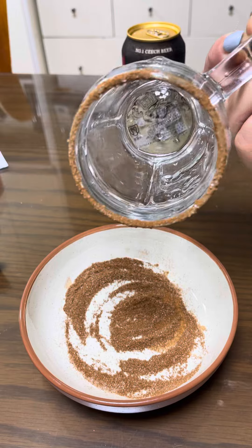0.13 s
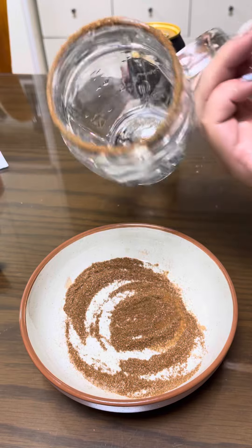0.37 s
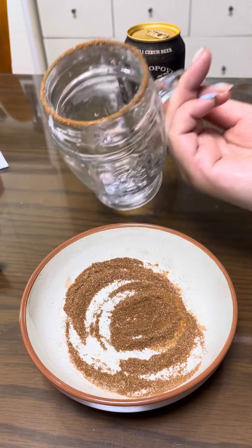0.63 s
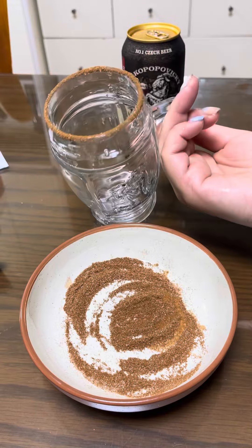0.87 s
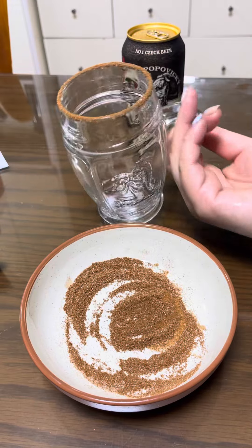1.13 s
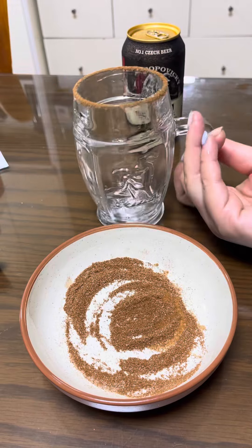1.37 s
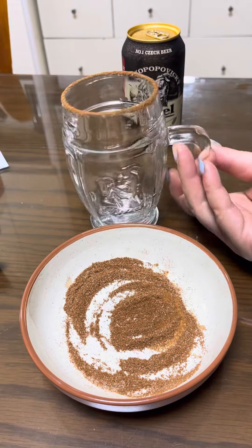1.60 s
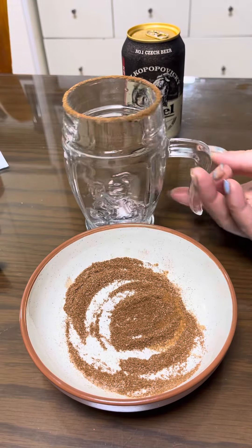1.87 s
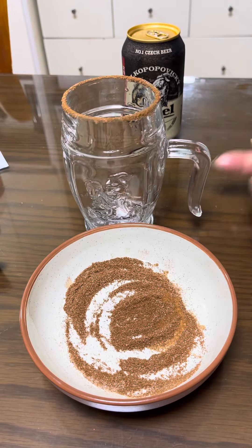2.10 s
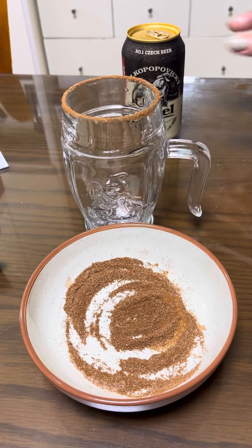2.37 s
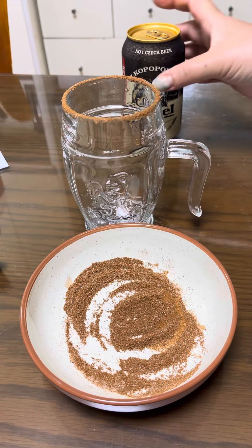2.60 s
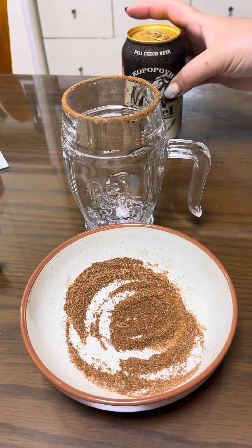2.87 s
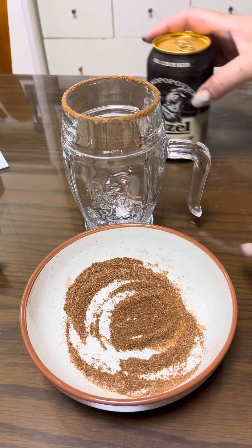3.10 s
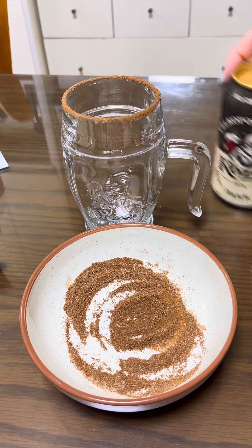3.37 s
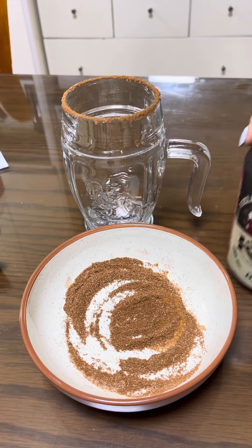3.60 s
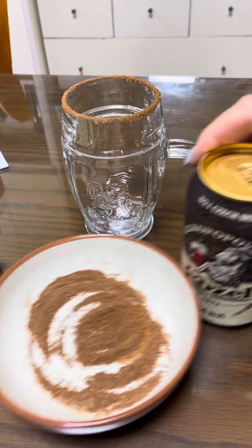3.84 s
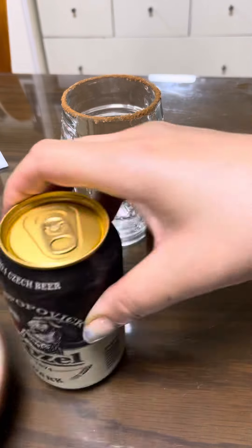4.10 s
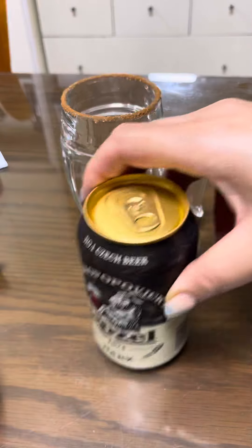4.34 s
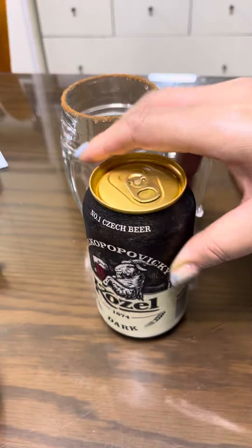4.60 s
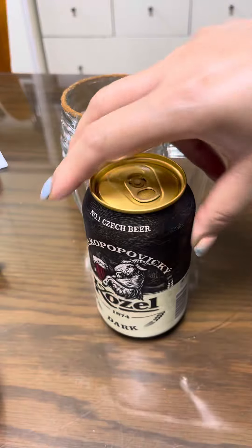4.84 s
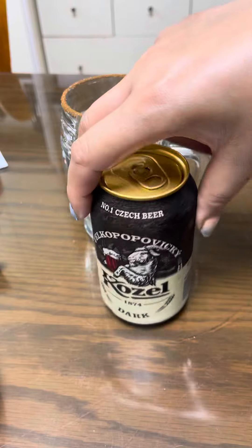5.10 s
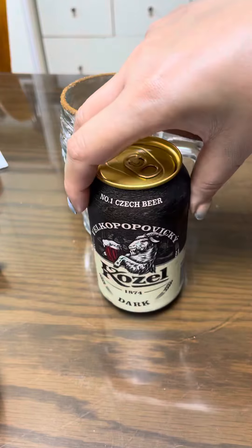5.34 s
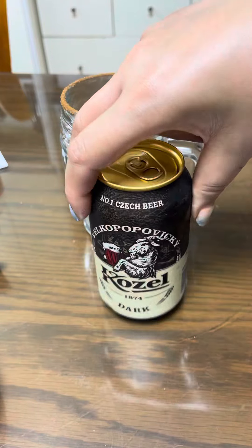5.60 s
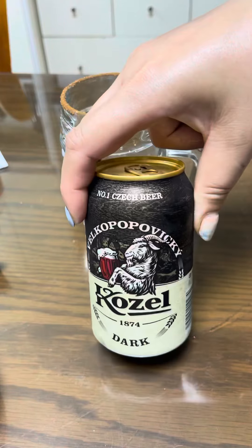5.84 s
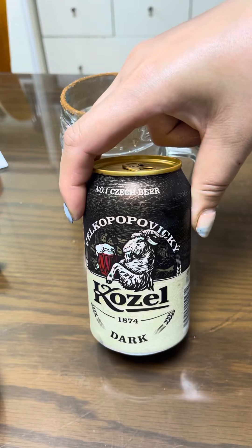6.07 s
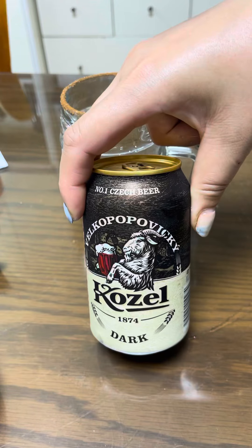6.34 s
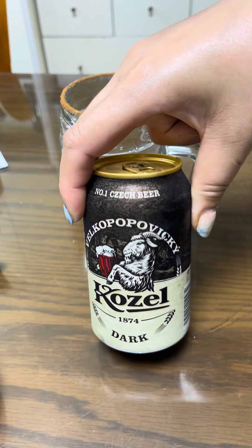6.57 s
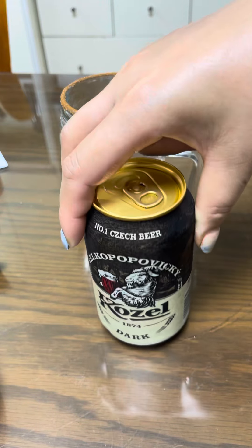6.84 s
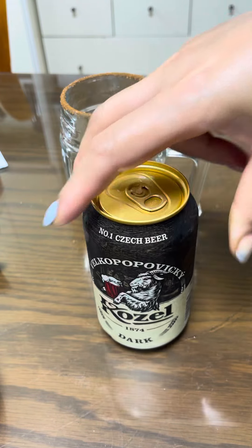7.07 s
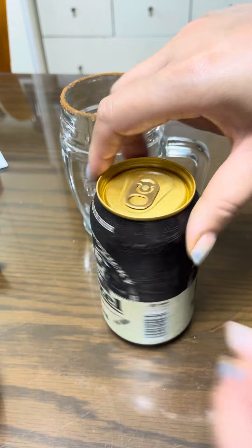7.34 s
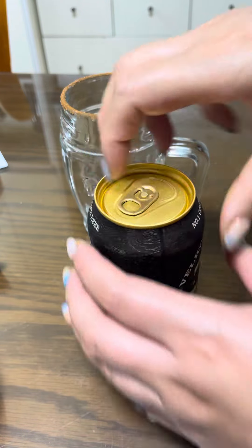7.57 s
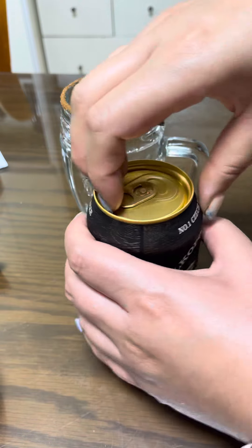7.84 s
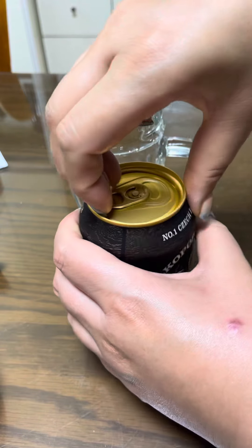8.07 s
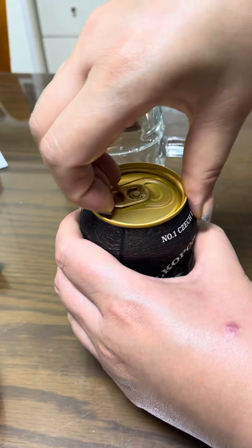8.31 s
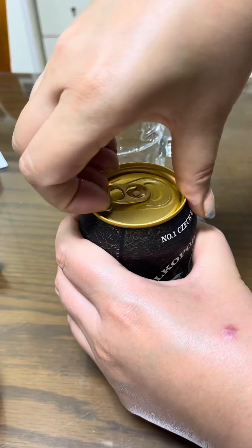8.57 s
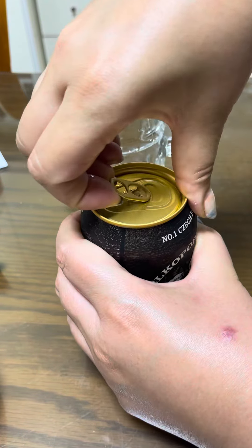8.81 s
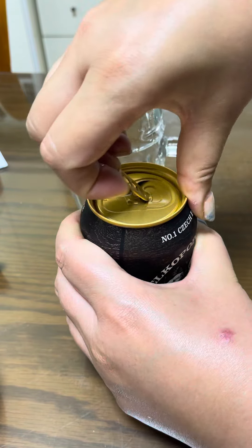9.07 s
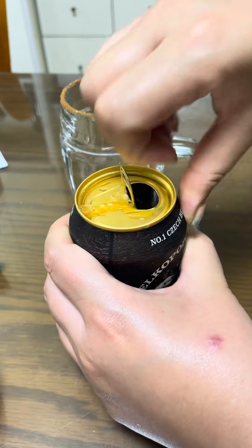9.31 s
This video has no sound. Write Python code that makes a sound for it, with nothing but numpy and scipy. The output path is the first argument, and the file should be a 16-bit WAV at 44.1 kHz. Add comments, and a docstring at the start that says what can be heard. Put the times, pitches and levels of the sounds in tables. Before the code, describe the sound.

Very close in a small hard room with a faint appliance hum, a thick glass mug lands hard on a wooden table and is turned with duller knocks. A can squeaks under the grip, a ceramic plate is shoved aside with knocks and gritty scraping, and the full can is set down and tilted softly. Fingernails tick on the lid, then gas spits and the metal tears open in sharp cracks.

```python
"""Mug, plate and can on a kitchen table

Close to a phone, a heavy glass mug is set down and turned, a plate is pushed aside, a full can is put down
and tilted, then a fingernail lifts its tab: gas hisses out and the lid tears open. Blows are noise bursts
with ringing modes; scraping, skin and gas are shaped noise. An appliance hums in a small hard room;
both microphone ports hear nearly the same sound with a phase twist."""
import sys
import numpy as np
from scipy import signal
from scipy.fft import rfft, irfft, next_fast_len
from scipy.io import wavfile
from scipy.ndimage import uniform_filter1d, map_coordinates

SR = 44100
rng = np.random.default_rng(int(sys.argv[2]) if len(sys.argv) > 2 else 0)


def ratio_of_db(decibels):
    """Turn decibels (scalar or array-like) into linear amplitude factors; 0 dB maps to 1."""
    return 10 ** (np.asarray(decibels, float) / 20)


def unload_audio(sound):
    """Save the sound as a 16-bit wav file, at the path given as the first command line argument."""
    columns = np.transpose(np.atleast_2d(sound))
    # keep every value between -1 and 1, then stretch to whole-number steps
    steps = np.round(np.clip(columns, -1, 1) * 32767)
    wavfile.write(sys.argv[1], SR, steps.astype(np.int16))


N = 416294
LEAD = 200  # samples of room before a burst for its filtered edge

# treble snap of a hard contact: f/Hz, level/dB per Hz
SNAP_SPECTRUM = [(3500, -19), (5200, 7.5), (6500, -2), (8500, 9), (10800, 2), (12300, -14.5), (13500, -31),
                 (17000, -64)]


def unit(x):
    """Brings a sound to rms 1."""
    return x / np.sqrt(np.mean(x ** 2) + 1e-20)


def along(points, hz):
    """Reads a curve of (Hz, value) points on a log frequency axis."""
    f, v = np.transpose(points)
    return np.interp(np.log(hz + 1), np.log(f + 1), v)


def gains(rows):
    """Gives a gain per sample for (s, dB) corners, silent outside them."""
    s, db = np.transpose(rows)
    return ratio_of_db(np.interp(np.arange(N) / SR, s, db, left=-200, right=-200))


def wobble(rate):
    """Draws a smooth random curve with rate knots a second."""
    knots = rng.standard_normal(int(N * rate / SR) + 4)
    return map_coordinates(knots, [np.arange(N) * rate / SR])


def filtered(x, response):
    """Multiplies the spectrum of x by a complex response of frequency."""
    m = next_fast_len(x.shape[-1] + 8192)
    spectrum = rfft(x, m) * response(np.fft.rfftfreq(m, 1 / SR))
    return irfft(spectrum, m)[..., :x.shape[-1]]


def coloured(x, spectrum):
    """Filters x with a spectrum and brings it to rms 1."""
    return unit(filtered(x, lambda hz: ratio_of_db(along(spectrum, hz))))


def diffuse(pair):
    """Mixes two unrelated signals into a left and right that are partly alike."""
    # left-right likeness of diffuse sound: f/Hz, likeness (1 = the same)
    likeness = [(200, 1), (400, 0.89), (700, 0.468), (1200, 0.14), (1800, 1), (2700, 0.63), (4300, 0.085),
                (5000, 0.43), (6000, 0.79), (7500, 0.43), (8500, 0.96), (9500, 1), (10800, 0.21)]
    turn = lambda hz: np.arccos(np.clip(along(likeness, hz), 0, 1)) / 2
    mid, side = filtered(pair, lambda hz: np.array([np.cos(turn(hz)), np.sin(turn(hz))]))
    return np.array([mid + side, mid - side])


def add(track, s, sound):
    """Mixes a sound in at time s."""
    part = track[round(s * SR):][:len(sound)]
    part += sound[:len(part)]


def ring(modes, db, ms, blur=.003):
    """Modes swing up while the contact lasts and die away; hand and table blur their pitch; peak at db."""
    t = np.arange(SR // 3) / SR
    hz, level, t60 = np.transpose(modes)[:, :, None]
    spread, phase = 1.5 * rng.normal(0, 1, (2, *hz.shape))
    steps = uniform_filter1d(rng.standard_normal((len(hz), len(t))), size=64, axis=1)
    drift = np.cumsum(steps, axis=1)
    turns = hz * (t + blur * drift * 8 / SR)
    sign_turn = np.pi * np.arange(len(hz))[:, None]  # every other mode starts upside down
    waves = np.sin(2 * np.pi * turns + .5 * phase + sign_turn)
    body = np.sum(ratio_of_db(level + spread - 60 * t / t60) * waves, axis=0)
    swing_up = (1 - np.exp(-t / (ms / 4000 + 0.000097))) ** 2
    out = body * swing_up
    return ratio_of_db(db) * out / np.max(np.abs(out))


def crack(spectrum, db, ms):
    """A dry burst of noise follows the contact time, its chance spectral peaks evened out; peak at db."""
    u = np.clip(np.arange(-LEAD, SR // 20) / SR / (ms / 1000 + 1e-4), 0, None)  # time in contacts
    z = rfft(rng.standard_normal(len(u)) * u * np.exp(-2.5 * u))
    evened = irfft(z / (np.abs(z) + 1e-9) ** .7, len(u))
    out = coloured(evened, spectrum) * signal.windows.tukey(len(u), .1)
    return ratio_of_db(db) * out / np.max(np.abs(out))


def set_down(events, modes, order, ring_db, tick_db, edge_hz, grows):
    """The rim clacks, duller when gentle, the object rings and the table swings up a moment later.

    Gives four rows: clack, ringing of the object, two views of the wide table."""
    # table frame: f/Hz, t60/s, level/dB under the mug, under the plate, under the can
    frame_modes = [(74.6, 0.141, -8, 1.5, -11), (105.7, 0.061, -5.5, -3, 1.5), (142, 0.081, -1.5, -7, 0.5),
                   (196, 0.07, 0.5, -1, 2.5), (261, 0.067, 2.5, 4.5, 6), (336, 0.066, 2, -4, -11),
                   (399.4, 0.046, 6.5, 4.5, 1), (456.5, 0.035, -1, 5.5, -5)]
    # table top: f/Hz, level/dB, t60/s
    top_modes = [(521, -5, 0.076), (638.5, 2, 0.045), (774, 0, 0.041), (908, 2, 0.027), (1083, -5.5, 0.057)]
    # heavy bases on varnish: f/Hz, level/dB per Hz
    clack_spectrum = [(500, -1), (1000, -1), (1600, 2.5), (2300, 4.5), (3100, -5.5), (4500, -6),
                      (6200, -27), (9000, -80)]
    tick_grows = 0.84  # harder blows are brighter: extra dB of treble tick per dB of clack
    tick_db_per_ms = -0.6  # slower contacts are duller
    out = np.zeros((4, N))
    frame = [(hz, levels[order], t60) for hz, t60, *levels in frame_modes]
    for s, db, thud_db, top_db, ms in events:
        # the treble edge falls by grows dB per dB
        soft = lambda hz: 1 / (1 + 1j * hz / (edge_hz * ratio_of_db(grows * db))) ** 3
        clack = filtered(crack(clack_spectrum, db, ms), soft)
        tick = crack(SNAP_SPECTRUM, db * (1 + tick_grows) + tick_db + tick_db_per_ms * ms, ms)
        add(out[0], s - LEAD / SR, clack + tick)
        add(out[1], s, filtered(ring(modes, db + ring_db, ms, blur=.02), soft))
        for view in out[2:]:
            add(view, s + 0.0011, ring(top_modes, db + thud_db + top_db, ms, blur=0.093))
            add(view, s + 0.0019, ring(frame, db + thud_db, ms, blur=0.056))
    return out


def metal_contacts(events, modes, contact_ms, ring_db, follows, blur):
    """Each tap or tear of the metal cracks, snaps in the treble, rings and sounds the can's hollow."""
    # crack of thin metal: f/Hz, level/dB per Hz
    crack_spectrum = [(500, -17), (1100, -11), (1700, 0.5), (2400, 5.5), (3500, -1), (4300, 5), (5400, -1),
                      (6800, -1.5), (8200, -33.5), (10000, -82)]
    # hollow of the can: f/Hz, level/dB, t60/s
    hollow_modes = [(340, 11, 0.0067), (790, -5.5, 0.025), (1373, 10, 0.013)]
    fold_s, fold_ms = 9.075, 3  # from here on the flap folds inward more slowly
    torn_s, torn_db = 8.85, 8  # the lid rings less once it is torn and held
    out = np.zeros(N)
    for s, db, snap_db, hollow_db in events:
        ms = contact_ms if s < fold_s else fold_ms
        burst = crack(crack_spectrum, db, ms) + crack(SNAP_SPECTRUM, db + snap_db, ms)
        add(out, s - LEAD / SR, burst)
        body_db = db + ring_db + follows * hollow_db - torn_db * (s > torn_s)
        add(out, s, ring(modes, body_db, ms, blur))
        add(out, s, ring(hollow_modes, db + hollow_db, ms, blur=0.11))
    return out


def tones(events, ms, blur):
    """Sounds one dying mode for each event."""
    out = np.zeros(N)
    for s, hz, db, t60 in events:
        add(out, s, ring([(hz, 0, t60)], db, ms, blur))
    return out


def appliance():
    """Motor tones waver slowly over a broad rush of air."""
    # motor tones: f/Hz, rms level before wavering/dB, waver/dB
    motor_tones = [(43, -60, 2), (58.5, -60, 2.5), (117, -67, 2), (156.5, -54, 1.5), (241, -64, 2)]
    # rush of air: f/Hz, level/dB per Hz
    air_spectrum = [(22, -19.5), (40, -8), (70, -5.5), (130, -6), (370, -8.5), (450, -16.5), (900, -20),
                    (1500, -24.5), (3500, -22), (4900, -20), (5700, -16.5), (6500, -22.5), (11200, -25),
                    (12000, -52), (12400, -110)]
    air_db = -51
    t = np.arange(N) / SR
    hum = np.zeros(N)
    for hz, db, waver_db in motor_tones:
        level = np.sqrt(2) * ratio_of_db(db + waver_db * wobble(8.9))
        hum += level * np.sin(2 * np.pi * hz * t + 1.03 * wobble(2.11))
    air = coloured(rng.standard_normal((2, N)), air_spectrum)
    return hum + ratio_of_db(air_db) * diffuse(air)


def fingers():
    """Skin scuffs softly: each brush is a swell of noise in one broad band."""
    # fingers brushing glass and metal: t/s, approximate peak level/dB, t60/s
    brushes = [(0.1635, -30, 0.2), (0.741, -36.5, 0.4), (1.0946, -39, 0.092), (1.609, -40, 0.089),
               (2.1763, -35.5, 0.28), (2.471, -31, 0.18), (2.6185, -47.5, 0.27), (5.251, -32.5, 0.35),
               (7.126, -38, 0.11), (7.156, -40.5, 0.18)]
    hz, rise_s = 3320, 0.0088  # middle of the band, swell time
    crest_db = 10.5  # noise peaks this far over its rms
    band = [(hz * 0.24, -30), (hz * 0.7, -3), (hz, 0), (hz * 1.42, -5), (hz * 3.86, -15), (hz * 3.3, -70)]
    out, t = np.zeros(N), np.arange(SR // 3) / SR
    for s, db, t60 in brushes:
        shape = (1 - np.exp(-t / rise_s)) * ratio_of_db(-60 * t / t60)
        noise = coloured(rng.standard_normal(len(t)), band)
        add(out, s - .003, ratio_of_db(db - crest_db) * shape / shape.max() * noise)
    return out


def mug():
    """The thick glass mug clacks on the table, and its short glass modes ring."""
    # blows: t/s, clack peak/dB, frame thud/dB re clack, table top/dB re thud, contact/ms
    blows = [(.8004, -4.5, -4.5, -5.5, 1.56), (.802, -4, -9, -1.5, 0.96), (1.3262, -38, -5, -2, 1.5),
             (1.3346, -24.5, -6.5, 1, 1.4), (1.3421, -18.5, -10.5, -2, 2.1), (1.4091, -28.5, -11, -9, 2.4),
             (1.570, -29.5, -19, -13, 2.1), (1.8206, -13, -15, -11, 5), (1.8246, -12, -0.5, -5, 3.8),
             (1.8723, -15, -3.5, -8, 1.9), (1.8826, -20, -2.5, 1, 2.4)]
    # glass body: f/Hz, level/dB, t60/s
    glass = [(1060, -7, .015), (1580, -1, .01), (1870, -5, .012), (2190, 0, .01), (2660, -5, .01),
             (3050, -2, .01), (3600, -3, .01), (4200, -5, .008)]
    return set_down(blows, glass, order=0, ring_db=0.5, tick_db=-1.0, edge_hz=20000, grows=0.79)


def singing():
    """The mug's wall, the plate's rim and the can's base sing in single thin tones as they land flat."""
    # tones: t/s, f/Hz, peak level/dB, t60/s
    thin_tones = [(1.873, 2977, -34.5, .24), (3.712, 3424, -40, .18), (4.207, 1760, -37, .15),
                  (5.828, 1520, -34, .13)]
    return tones(thin_tones, ms=3.8, blur=.003)


def drag():
    """Can and plate drag over grit: dense uneven grains, coarse and fine, in strokes that speed up and slow."""
    # strokes over the varnish: start t/s, length/s, scrape level/dB, fine hiss/dB re scrape
    strokes = [(2.87, 0.62, -58, 0.5), (3.339, 0.21, -49, 1), (3.533, 0.11, -47.5, 0.5),
               (3.657, 0.16, -47, 0), (3.797, 0.21, -48.5, 1.5), (3.945, .2, -42.5, -2),
               (6.57, 0.18, -57.5, 0), (7.077, 0.28, -60.5, 4.5), (8.15, 0.15, -58, -1)]
    # coarse grains in the wood: f/Hz, level/dB per Hz
    scrape_spectrum = [(300, 10.5), (700, -2), (1500, -10), (2050, -23), (2700, -9), (3600, -9), (5000, 3),
                       (6000, -39), (7500, -100)]
    # fine grains in the air: f/Hz, level/dB per Hz
    fine_spectrum = [(4000, -41), (5500, -5), (7500, -3), (11000, 1), (12300, -25), (13000, -80)]
    # bodies that the grit wakes by turns: f/Hz, resonance width/Hz, level/dB re scrape
    rubbed_bodies = [(1740, 300, -8), (2300, 380, -6), (3050, 370, -13)]
    peak_share, roundness = 0.45, 1.05  # share of the stroke spent speeding up; softness of its ends
    t = np.arange(N) / SR
    speed = []
    for s, length, *_ in strokes:
        ramp = np.interp(t, [s, s + peak_share * length, s + length], [0, 1, 0])
        speed.append(np.sin(np.pi / 2 * ramp) ** roundness)
    _, _, db, fine_db = np.transpose(strokes)
    grains = rng.standard_normal((2, N)) * ratio_of_db(3.9 * wobble(150) + 2.1 * wobble(30))
    coarse = coloured(grains[0], scrape_spectrum)
    for centre, width, body_db in rubbed_bodies:
        resonance = lambda hz: (1j * hz * width / (centre ** 2 - hz ** 2 + 1j * hz * width)) ** 2
        body = filtered(grains[0] * ratio_of_db(3 * wobble(25)), resonance)
        coarse = coarse + ratio_of_db(body_db) * unit(body)
    fine = coloured(grains[1], fine_spectrum)
    return ratio_of_db(db) @ speed * coarse + ratio_of_db(db + fine_db) @ speed * fine


def squeaks():
    """The can's wall squeaks under the grip in short, slowly swelling tones."""
    # squeaks: t/s, f/Hz, peak level/dB, t60/s
    grip_squeaks = [(3.025, 2460, -53, 0.18), (3.03, 3200, -59, .08), (3.055, 2160, -56, .2),
                    (3.125, 2480, -57, 0.16), (3.145, 2240, -59, 0.1), (3.232, 2180, -53, 0.046),
                    (3.382, 2420, -36.5, 0.045), (3.425, 2420, -58, .15), (3.46, 3040, -54, .1),
                    (3.465, 2350, -58, .08), (3.557, 2220, -48, 0.047), (3.583, 3050, -57, 0.042),
                    (6.61, 2940, -57, .06), (6.635, 2350, -55, .12), (6.67, 1524, -57, 0.14),
                    (6.672, 2880, -51, 0.039), (7.145, 2950, -54, .1)]
    return tones(grip_squeaks, ms=30, blur=.012)


def fingernail():
    """The nail taps the sealed, pressurised can, whose stiff shell rings briefly."""
    # taps: t/s, crack peak/dB, snap/dB re crack, hollow/dB re crack
    taps = [(3.2326, -46, 13, -3), (3.3823, -40.5, 17, 5), (3.4695, -47.5, 14, 10.5),
            (3.5514, -47, 15, -14), (3.5863, -37, 15.5, -26), (3.695, -37, 15, -1), (4.018, -38, -1, -10),
            (4.0514, -42, -3, -6), (4.2544, -45, 10.5, -10), (7.7116, -33.5, 4, -10),
            (7.7243, -29.5, 7.5, -12), (7.7744, -51, 16, -1), (8.0514, -26.5, 15.5, -2.5),
            (8.0844, -43, 14, 0), (8.2043, -48.5, 17, 0), (8.2866, -42, 11, -20)]
    # shell of the sealed can: f/Hz, level/dB, t60/s
    shell = [(2450, 0, .022), (3050, -4, .022), (6100, -8, .025)]
    return metal_contacts(taps, shell, contact_ms=3.1, ring_db=3, follows=0.25, blur=0.0075)


def plate():
    """The plate knocks on the table as it is pushed, and its ceramic modes ring."""
    # blows: t/s, clack peak/dB, frame thud/dB re clack, table top/dB re thud, contact/ms
    blows = [(3.711, -11, -15, -2, 2.2), (3.7369, -19, -8.5, -2.5, 1.6), (3.7614, -18.5, -16, 5, 1.5),
             (3.9294, -42.5, -0.5, 7, 1.7), (3.9459, -30, -30, -1, 0.83), (3.9944, -34, -21, 20, 1.4),
             (4.0018, -20, -8, 4, 2.26)]
    # ceramic body: f/Hz, level/dB, t60/s
    ceramic = [(1050, -3, .025), (1717, -3, .025), (2290, -4, .018), (2570, -3, .018), (6760, -20, .03)]
    return set_down(blows, ceramic, order=1, ring_db=-5.5, tick_db=-2.0, edge_hz=27000, grows=0.41)


def can():
    """The full can lands and tilts on its base, whose metal modes ring."""
    # blows: t/s, clack peak/dB, frame thud/dB re clack, table top/dB re thud, contact/ms
    blows = [(4.2053, -22, 4.5, -2, 3.5), (5.2201, -43, 5.5, -4, 2.4), (5.8272, -27, 7, -11, 5.5),
             (6.6717, -42, 9, -19, 4.5), (6.8597, -66, 32.5, -18, 5.5), (6.8788, -27.5, 1.5, -4.5, 3.2),
             (7.1626, -42, 7, -17, 4.8), (7.214, -44.5, -13, -10, 1.8), (8.1824, -48.5, 8, -1.5, 1.9)]
    # base of the can: f/Hz, level/dB, t60/s
    base = [(1150, -10, .025), (1520, -1, .03), (1770, -4, .025), (2320, -5, .025), (2700, -4, .022),
            (2950, -5, .022), (3400, -4, .012)]
    return set_down(blows, base, order=2, ring_db=1.5, tick_db=11.5, edge_hz=34000, grows=0.5)


def tearing_lid():
    """The lid tears in a run of sharp cracks that make the bent metal and the tab ring."""
    # tears: t/s, crack peak/dB, snap/dB re crack, hollow/dB re crack
    tears = [(8.6205, -33.5, -8, -24), (8.6312, -14.5, 14.5, -33), (8.6338, -28, 24, -39),
             (8.7042, 0, -7, -26.5), (8.939, -29, -15, -5), (8.9505, -4.5, 2, -9), (8.9555, -24, -7, -21),
             (8.9595, -12, -8, -21), (8.966, -16.5, -5, -23), (9.018, -38, 19, -28), (9.0361, -15, 4, -35),
             (9.042, -21.5, 6, -30), (9.0536, -21, 13, -24), (9.0567, -21.5, 18, -8), (9.061, -26, 16, -10),
             (9.067, -22, -2, -9), (9.081, -15, 6, -32), (9.0855, -5.5, 8, -4.5), (9.096, -35.5, -13, 11),
             (9.1125, -16.5, -20, 1), (9.120, -25, -5.5, 9)]
    # bent lid and tab: f/Hz, level/dB, t60/s
    lid = [(2100, -26, .07), (2330, -3, .012), (3784, -25, .28), (3900, -20, .08), (3980, 2, .015),
           (4145, -26, .2), (4300, -30, .2), (5250, -1, .012), (6650, -5, .012)]
    return metal_contacts(tears, lid, contact_ms=1.3, ring_db=-2, follows=0, blur=.025)


def gas():
    """A turbulent jet sputters as foam crosses the slit; the breaking seal puffs low."""
    # jet and low jet: f/Hz, level/dB per Hz
    jet_spectrum = [(7500, -63), (9000, 8), (11000, 1), (12600, -7.5), (14600, -12), (15600, -46)]
    low_spectrum = [(800, -33.5), (2500, -25), (4500, -13), (6500, -8), (8000, -2.5), (9500, -29.5),
                    (11000, -80)]
    seal_s, build_s, wide_s = 8.634, 0.045, 8.706  # seal breaks, jet builds up, slit tears wide
    collapse_s, fizz_fade_s = 0.0136, 0.27
    start_db, full_db, wide_db, fizz_db = -31, -13.5, -23.5, -48.5
    low_db, puff_db, puff_fade_s = -14, -19, 0.007  # low_db is relative to the jet
    fizz_s = wide_s + collapse_s
    jet = gains([(seal_s, start_db), (seal_s + build_s, full_db), (wide_s, wide_db),
                 (fizz_s, fizz_db), (fizz_s + fizz_fade_s, fizz_db - 57)])
    puff = gains([(seal_s, puff_db), (seal_s + puff_fade_s, puff_db - 59.0)])
    low = ratio_of_db(low_db) * jet + puff
    noise = rng.standard_normal((2, N)) * ratio_of_db(1.5 * wobble(300))  # sputter
    return jet * coloured(noise[0], jet_spectrum) + low * coloured(noise[1], low_spectrum)


def score_line():
    """The lid's score line lets go in thin spits: one very high noise burst for each bit that parts."""
    # spits: t/s, peak level/dB, contact/ms
    spits = [(8.9508, -22, 1.9), (9.0362, -4, 1.4), (9.0424, -23, 1.7), (9.0538, -10, 2.3),
             (9.0568, -9, 3.5), (9.062, -27, 4.7), (9.0812, -20.5, 2.7), (9.0858, -18, 4.1),
             (9.1126, -23.5, 2)]
    # one spit: f/Hz, level/dB per Hz
    spit_spectrum = [(9000, -44), (10200, -8), (11500, 1), (12800, -11), (14500, -23), (16500, -61.5)]
    out = np.zeros(N)
    for s, db, ms in spits:
        add(out, s - LEAD / SR, crack(spit_spectrum, db, ms))
    return out


def room(x):
    """The room answers every short stretch with a fresh noise tail; each frequency dies at its own speed."""
    # decay of the room: f/Hz, t60/s
    decay = [(100, 0.15), (500, 0.33), (2000, 0.29), (4000, 0.28), (6000, 0.21), (11800, 0.21),
             (12800, 0.027)]
    out, size = np.zeros((2, N + 2 * SR)), SR // 4
    for k in range(0, N, size):
        hz, t, z = signal.stft(rng.standard_normal((2, SR // 2)), SR, nperseg=256)
        fading = z * ratio_of_db(-60 * t / along(decay, hz)[:, None])
        tail = signal.istft(fading, SR, nperseg=256)[1]
        wet = signal.fftconvolve(x[None, k:k + size], tail / np.linalg.norm(tail[0]), axes=1)
        out[:, k + 200:k + 200 + wet.shape[1]] += wet  # the tail starts 200 samples late
    return diffuse(out[:, :N])


def scene():
    """Blows on the table fill the room more than ringing objects and the small sounds close to the phone."""
    blows, rings, *table = mug() + plate() + can()
    close = fingers() + drag() + fingernail() + tearing_lid() + gas() + score_line()
    thin = singing() + squeaks()  # these stay out of the room
    to_room = ratio_of_db(-7.5) * (blows + table[0]) + ratio_of_db(-12.5) * rings + ratio_of_db(-16.0) * close
    direct = blows + diffuse(np.array(table)) + rings + close + thin
    return direct + room(to_room) + appliance()


def band_limit(x):
    """A steep low-pass at the top of the band."""
    return signal.sosfilt(signal.butter(12, 16390, fs=SR, output="sos"), x)


def record(dry):
    """Sharp treble pulls the gain down for a moment; the capsule drops deep bass; the ports differ in phase."""
    # phase twist between the ports: f/Hz, left leads by/radians
    twist = [(0, 0), (300, -.1), (1000, -.7), (1700, 0), (2500, .6), (4200, 1), (4850, 3.1), (5800, 6.2),
             (6300, 6.4), (8400, 9.3), (9600, 9.55), (11700, 12.4), (13500, 12.8), (16000, 15.6)]
    slow = np.exp(-1 / (.25 * SR))  # the gain recovers over a quarter second
    treble = np.diff(dry[0], prepend=0)
    power = signal.lfilter([1 - slow], [1, -slow], treble ** 2)
    quiet = dry * (1 + power / ratio_of_db(-32.0) ** 2) ** -.2
    quiet = signal.sosfilt(signal.butter(3, 36, 'high', fs=SR, output='sos'), quiet)
    f, turn = np.transpose(twist)
    halves = np.array([[1], [-1]])  # left ahead, right behind
    ports = filtered(quiet, lambda hz: np.exp(.5j * np.interp(hz, f, turn) * halves))
    return band_limit(ports)


dry = scene()
out = record(dry)
unload_audio(out)
```